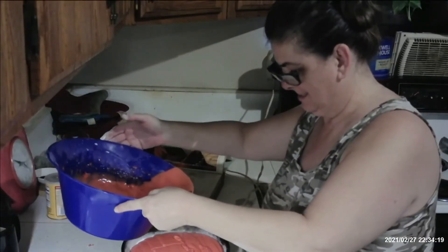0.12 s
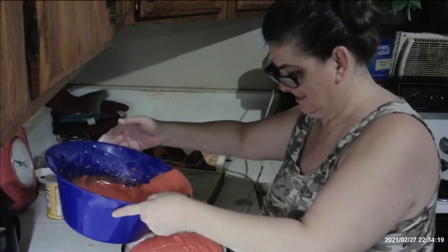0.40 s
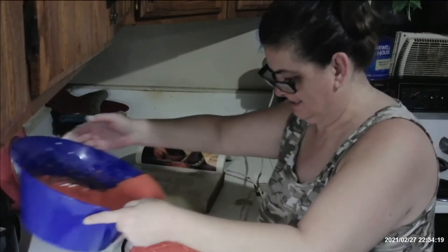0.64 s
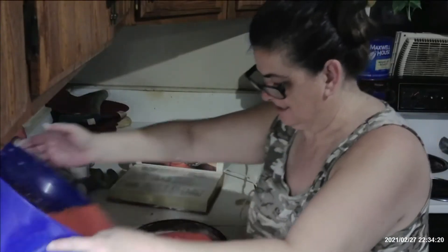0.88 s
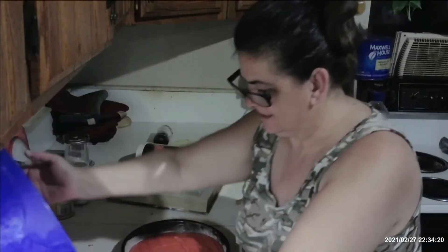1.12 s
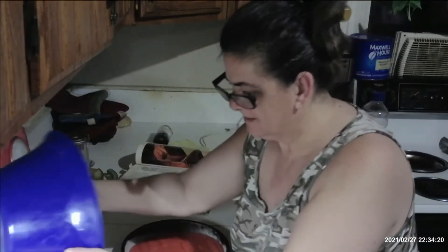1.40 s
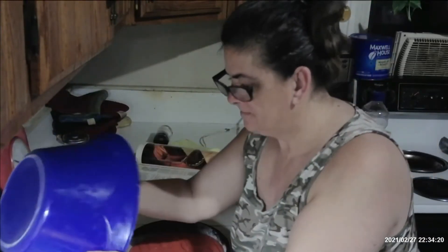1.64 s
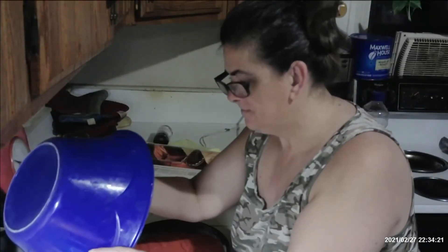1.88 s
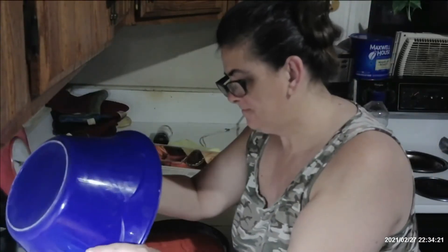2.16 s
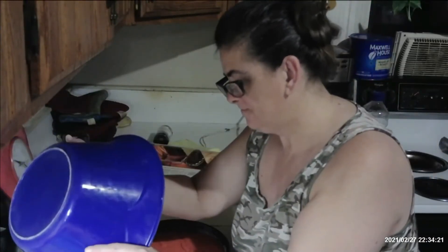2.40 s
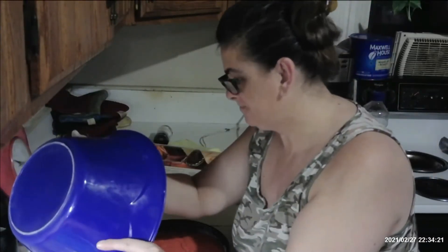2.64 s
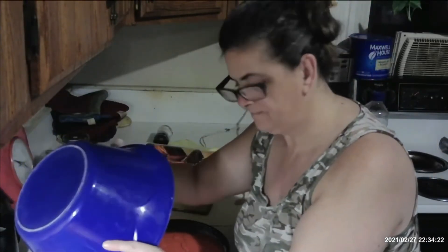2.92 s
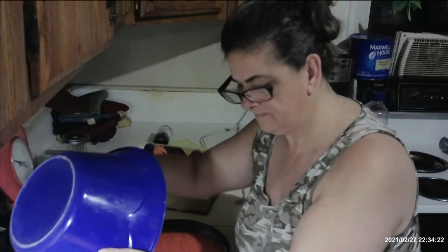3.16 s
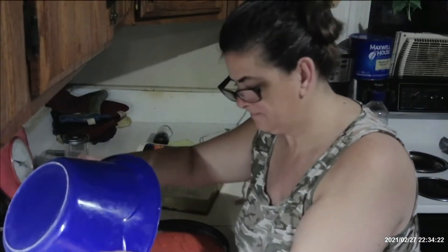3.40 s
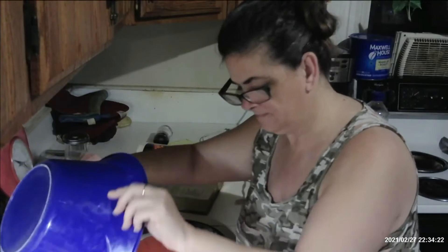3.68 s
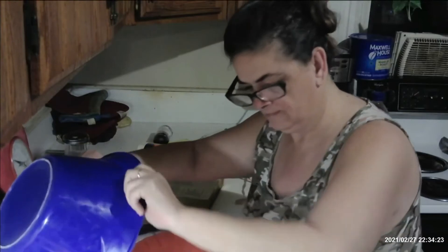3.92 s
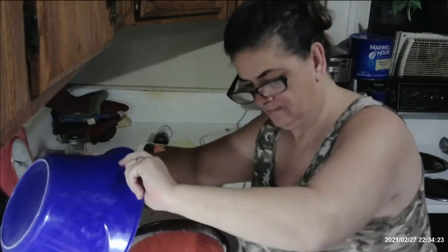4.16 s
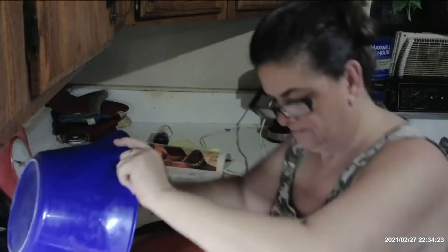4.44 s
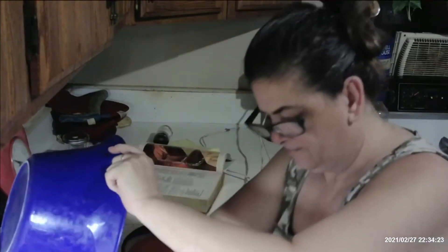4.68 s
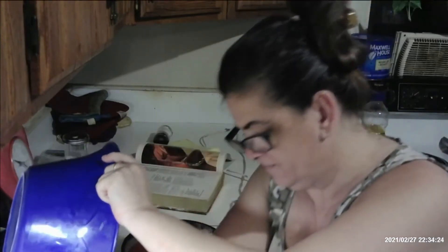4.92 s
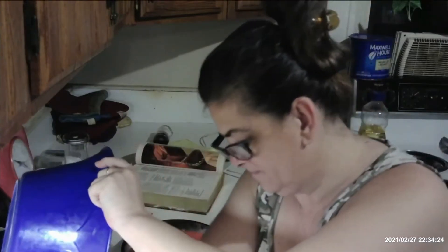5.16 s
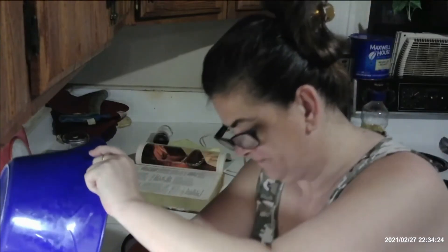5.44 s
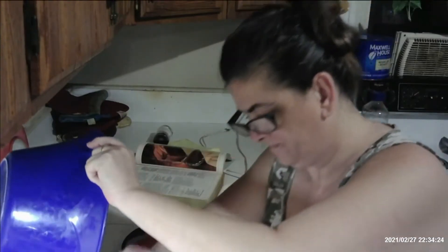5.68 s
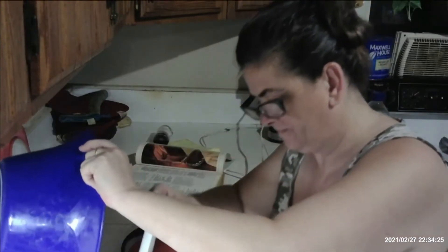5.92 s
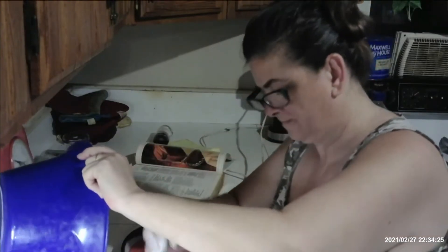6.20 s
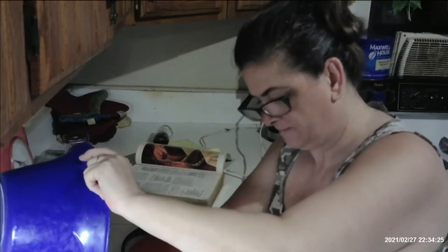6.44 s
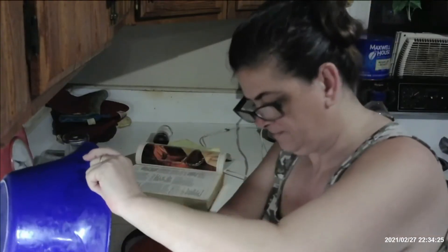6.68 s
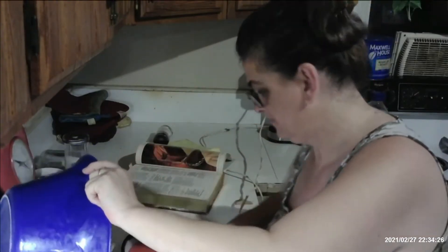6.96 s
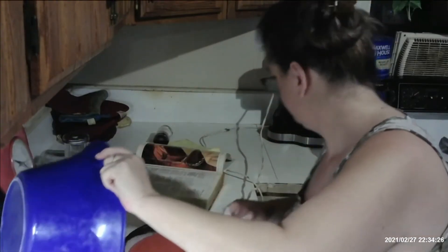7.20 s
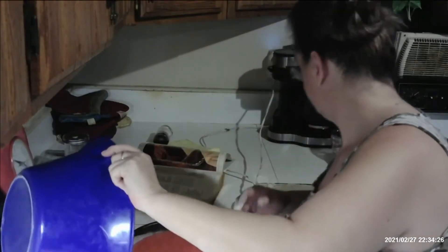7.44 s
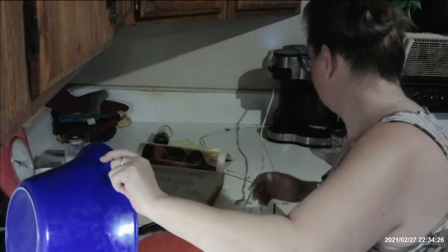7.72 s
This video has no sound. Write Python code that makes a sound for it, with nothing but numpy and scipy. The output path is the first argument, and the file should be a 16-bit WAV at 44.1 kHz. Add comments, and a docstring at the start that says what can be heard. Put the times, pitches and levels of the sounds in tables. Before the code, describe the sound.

A small kitchen heard through a close, modest microphone with softened treble: steady broadband hiss and a faint, wavering refrigerator hum run throughout. The first second holds only this background. At about 1.1 and 1.3 s the plastic bowl is lightly bumped, with a barely audible thin squeak. Short, wet, sticky scrapes come around 2.0-2.4 s, then softer strokes from 2.9 s, with a small tap at 3.7 s. From 4 s the spatula strokes lengthen and strengthen, with light ticks. At 4.8 s a duller knock starts an uneven clatter, growing dense from 5.2 to 5.9 s, hollow plastic clacks and bright snaps over heavy scraping, loudest near 5.7 s. A brief lull follows. Three hard knocks land at 6.55, 6.64 and 6.82 s, freer ringing, the first two with low counter thuds, with tiny rattles after the last two. A faint rub and soft thud near 7.1 s fade into hum.

```python
"""A small kitchen: a spatula scrapes thick batter out of a plastic bowl in wet strokes, then blade and
handle clatter against the wall, and three knocks follow as bowl and tool meet the counter.
Strokes are lumpy noise and tiny slips that shake the bowl; blows are clicks, snaps and dying modes.
A refrigerator hums in wavering tones under a steady noise wash of room and microphone."""
import sys
import numpy as np
from scipy import signal
from scipy.fft import rfft, irfft
from scipy.io import wavfile
from scipy.ndimage import uniform_filter1d

SR = 44100
rng = np.random.default_rng(int(sys.argv[2]) if len(sys.argv) > 2 else 0)


def elevation(decibels):
    """Turn decibel levels (scalar or array-like) into linear amplitude ratios."""
    levels = np.asarray(decibels, float)
    return 10 ** (levels / 20)


def dump_mix(stems):
    """Bounce the given channels to the path in sys.argv[1] as a 16-bit WAV at rate SR."""
    frames = np.atleast_2d(stems).T  # one column per channel
    limited = np.clip(frames, -1, 1)  # hard clip at full scale
    pcm = np.round(limited * 32767).astype(np.int16)
    wavfile.write(sys.argv[1], SR, pcm)


N = 345214  # length in samples

# modes of the plastic bowl: (f/Hz, relative level/dB, t60/s before grip or batter shortens it)
BOWL_MODES = [(303.52, -2, 0.22), (329.43, -4.5, 0.13), (429, -8.5, 0.11), (491, -7, 0.082),
              (552.5, -7, 0.18), (621.91, 1.5, 0.2151), (727, 0, 0.24043), (807, -5.5, 0.25),
              (879, -10.5, 0.4775), (1100, -3, 0.19605), (1145, -2, 0.14807), (1236, -10, 0.3244),
              (1324, -7, 0.3822), (1385, 6, 0.07122), (1360, -28, 0.4716), (1520, -39, 0.05),
              (1550, 3.5, 0.07784), (1627.3, -20.5, 0.12), (1748, -3.5, 0.2), (1895, 2, 0.12),
              (1960, 0, 0.038), (2196, 2, 0.08818), (2270, -10, 0.32), (2490, -7, 0.128),
              (2500, -17.5, 0.15), (2834, -7, 0.1575), (3050, -4.5, 0.1675), (3340, -26, .2),
              (3570, -3, 0.09726), (4016, -8, 0.27)]


def evened(x):
    """Scales to rms 1."""
    return x / np.sqrt(np.mean(x ** 2) + 1e-20)


def read(points, hz):
    """Reads a table on a log frequency axis."""
    f, value = np.transpose(points)
    return np.interp(np.log(hz + 1), np.log(f + 1), value)


def add(mix, s, sound):
    """Mixes a sound in at time s."""
    part = mix[round(s * SR):][:len(sound)]
    part += sound[:len(part)]


def resonate(x, hz, width_hz):
    """A two-pole resonance of gain near 1."""
    r = np.exp(-np.pi * width_hz / SR)
    return signal.lfilter([1 - r, 0, r - 1], [1, -2 * r * np.cos(2 * np.pi * hz / SR), r * r], x)


def drift(count, span):
    """Slow chance of rms 1."""
    return evened(uniform_filter1d(uniform_filter1d(rng.standard_normal(count), span), span))


def wash():
    """Steady room and microphone noise, coloured in frequency, with faint drifting patches."""
    # colour of the noise: (f/Hz, relative level/dB)
    wash_colour = [(12, -69), (20, -27), (59, -16.5), (90, -23.5), (109, -10.5), (143, -13), (172, -7.5),
                   (208, -6.5), (295, -7), (328, -3), (356, -7.5), (864, -2), (1650, -10), (1790, -10),
                   (12400, -25), (16100, -76), (22000, -120)]
    level_db, top_hz, patch_db = -55, 12450, 0.8213
    hz, _, z = signal.stft(rng.standard_normal(N), SR, nperseg=2048, noverlap=1536)
    patches = evened(uniform_filter1d(uniform_filter1d(rng.standard_normal(z.shape), 16, 0), 8, 1))
    z = z * elevation(read(wash_colour, hz)[:, None] + patch_db * patches)
    z = z * (hz < top_hz)[:, None]
    noise = signal.istft(z, nperseg=2048, noverlap=1536)[1][:N]
    return elevation(level_db) * evened(noise)


def refrigerator():
    """Motor tones that waver a little in level and pitch."""
    # steady tones of the hum: (f/Hz, rms level/dB about which it wavers)
    hum_tones = [(120, -77.5), (240, -82), (267, -74.5), (300.5, -70), (641, -78.5), (6352, -82)]
    t, slow = np.arange(N) / SR, np.linspace(0, N / SR, 800)
    hum = np.zeros(N)
    for hz, db in hum_tones:
        level = np.interp(t, slow, elevation(db + 2.3 * drift(800, 14)))
        phase = np.interp(t, slow, 0.5106 * drift(800, 9))
        hum += level * np.sqrt(2) * np.sin(2 * np.pi * hz * t + phase)
    return hum


def kitchen(x):
    """Sparse reflections of random sign, each band dying at its own speed; three echo patterns
    blend slowly into one another, so no single room colour stands out."""
    # how long the room rings: (f/Hz, t60/s)
    room_decay = [(200, 0.62), (700, 0.26), (2000, 0.34), (5000, 0.31), (10000, 0.4)]
    out, turn = np.zeros(N), np.arange(N) / SR / .21
    for k in range(3):
        taps = np.zeros(SR // 2)
        at = np.arange(200, len(taps) - 20, 20)
        taps[at + rng.integers(0, 20, len(at))] = rng.choice([-1., 1.], len(at))
        hz, t, z = signal.stft(taps, SR, nperseg=256)
        fading = z * elevation(-60 * t / read(room_decay, hz)[:, None])
        tail = signal.istft(fading, SR, nperseg=256)[1]
        share = np.sqrt(2 / 3) * np.cos(np.pi * (turn + k / 3))  # squares of the three shares sum to 1
        out += signal.oaconvolve(x * share, tail / np.linalg.norm(tail))[:N]
    return out


def microphone(x):
    """The small microphone dulls the treble, most of all near 13 kHz."""
    # microphone response: (f/Hz, gain/dB)
    response = [(20, -2.5), (9000, 0.5), (11500, -7), (13000, -18), (16000, -7)]
    return irfft(rfft(x) * elevation(read(response, np.fft.rfftfreq(N, 1 / SR))), N)


def squeak(start, length, db, hz):
    """A thin tone wavering in pitch and level."""
    t = np.arange(0, length, 1 / SR)
    turns = np.cumsum(hz + 20. * drift(len(t), 300)) / SR
    level = elevation(db + 2.5 * drift(len(t), 700))
    return start, level * np.sin(2 * np.pi * turns) * signal.windows.hann(len(t))


def ring(modes, push_db, free, spread_db, detune):
    """Dying sines, one column a mode; each blow lands elsewhere and the grip shifts, so they scatter."""
    t = np.arange(SR // 4)[:, None] / SR
    hz, db, t60 = np.transpose(modes)
    place, grip, side = rng.standard_normal((3, len(hz)))
    rise = 1 - np.exp(-t * hz)  # a mode takes a cycle or two to swing out
    waves = rise * np.sin(2 * np.pi * hz * (1 + detune * grip) * t) * np.sign(side)
    decay = elevation(push_db + db + spread_db * place - 60 * t / (free * t60))
    fade = signal.windows.tukey(2 * len(t), .3)[len(t):, None]
    return decay * waves * fade


def thud(push_db):
    """Weight landing on the counter, which answers with a few low modes."""
    # modes of the counter: (f/Hz, relative level/dB, t60/s before the load shortens it)
    counter_modes = [(71.32, -11, 0.23), (120.2, -3, 0.1596), (162.71, -5.5, 0.41), (196.64, 1, 0.3),
                     (222, -2, 0.26)]
    return ring(counter_modes, push_db, free=0.86, spread_db=1.9, detune=0.0053).sum(1)


def knock(free, click_db, click_hz, boom_db, snap_db):
    """A short click at the contact, a treble snap of the blade, and the bowl ringing on."""
    # blade edge: (f/Hz, width/Hz of each of two resonances in a row, relative level/dB)
    blade_edge = [(3240, 1400, 15.5), (4350, 3184.4, 18), (7300, 4275, -29)]
    boom_top_hz = 620  # modes below this make the boom
    ring_db = -4.5  # peak of the upper ring relative to the click
    t = np.arange(1500) / SR
    burst = rng.standard_normal((2, len(t))) * np.exp(-t / [[.003], [.004]])
    click = resonate(burst[0] + 4. * (t == 0), click_hz, 0.27 * click_hz)
    click = resonate(click, click_hz, 2.6 * click_hz)
    snap = sum(elevation(db) * resonate(resonate(burst[1], hz, w), hz, w) for hz, w, db in blade_edge)

    hz = np.transpose(BOWL_MODES)[0]
    low = hz < boom_top_hz
    held_db = -15. * (1 - free) * (hz < 400)  # the hand stills the widest swings first
    match_db = -6. * np.log2(hz / click_hz) ** 2  # a blow drives best the modes near its own pitch
    push_db = np.where(low, boom_db + held_db, match_db)
    freedom = np.where(low, free, 0.3201 * free)
    modes = ring(BOWL_MODES, push_db, freedom, spread_db=0.96, detune=0.012)

    # the contact chatters: small after-blows roughen the upper ring
    after = np.arange(5000) / SR
    struck = rng.random(5000) < 2000. / SR  # about 2000 after-blows a second
    chatter = 0.26344 * rng.standard_normal(5000) * struck * np.exp(-after / (0.021 * free))
    chatter[0] = 1
    out = signal.fftconvolve(modes[:, ~low].sum(1), chatter)
    out *= elevation(click_db + ring_db) / abs(out).max()
    add(out, 0, modes[:, low].sum(1))
    add(out, 0, elevation(click_db) * click / abs(click).max())
    add(out, 0, elevation(snap_db) * snap / abs(snap).max())
    return out


def rattle(start, length, db):
    """The tool rattles loosely against the wall: small uneven blows as rows for knock."""
    gap_s, pitch_hz, boom_db, snap_db = .012, 1296.3, -7, -34  # boom and snap relative to the click
    slip, size, pitch, boom, snap = rng.standard_normal((40, 5)).T
    s = start + gap_s * (np.arange(len(slip)) + .25 * slip)
    db = db + 2 * size
    rows = [s, db, pitch_hz * np.exp(.25 * pitch), db + boom_db + 2.944 * boom, db + snap_db + 3.1 * snap]
    return list(np.transpose(rows)[s < start + length])


def stroke(start, bite, length, hiss_db, bright):
    """Wet friction: lumpy hiss and tiny sticky slips, which also shake the bowl wall."""
    # colour of the scrape before each stroke's own tilt: (f/Hz, relative level/dB)
    scrape_colour = [(180, -25), (300, -20.5), (447, 1.5), (574, 2.5), (624, -25), (737, 10.5), (1300, 2.5),
                     (4750, 0.5), (8220, -5.5), (16000, -22)]
    # a stroke bites from edge_db up, sags while it is drawn, and lifts off
    edge_db, sag_db_per_s, lift_s = -12.5, -4.5, 0.13
    wall_db, wall_per_bright = -12.5, -0.74  # a duller, heavier stroke shakes the wall more
    t = np.arange(0, length, 1 / SR)
    count = round(.6 * SR)  # drawn longer than any stroke, then cut
    size, chance, side = rng.random((3, count))[:, :len(t)]
    slip_size = elevation(2.1 * np.minimum(-np.log(size + 1e-9), 4))
    slips = slip_size * (chance < 900 / SR) * np.sign(side - .5)  # about 900 slips a second
    rub = (elevation(1.597 * drift(count, 250)) * rng.standard_normal(count))[:len(t)]
    drive = evened(rub) + 0.6828 * evened(slips)

    hz, _, z = signal.stft(drive, SR, nperseg=256, noverlap=192)
    colour = elevation(read(scrape_colour, hz) + bright * np.log2(hz / 4000 + 0.02994))
    hiss = signal.istft(z * colour[:, None], nperseg=256, noverlap=192)[1][:len(t)]
    # batter and hand damp the wall, so its modes are broad here
    wall = np.zeros(len(t))
    for k, (f, db, t60) in enumerate(BOWL_MODES):
        wall += (-1) ** k * elevation(db) * resonate(drive, f, 13.62 / t60)

    lift = min(lift_s, length - bite)
    edge = np.clip(np.maximum(1 - t / bite, 1 - (length - t) / lift), 0, 1)
    shape_db = edge_db * edge + sag_db_per_s * t
    both = evened(hiss) + elevation(wall_db + wall_per_bright * bright) * evened(wall)
    return start, elevation(hiss_db + shape_db) * both * signal.windows.tukey(len(t), .1)


def scene():
    """Bowl sounds and their reflections through the microphone, over the background."""
    # strokes of the spatula: (t/s, time to full bite/s, length/s, hiss level/dB, brightness/dB per octave)
    strokes = [(1.401, .04, 0.0603, -59, 6), (1.998, .04, 0.0922, -55.5, -3.5),
               (2.148, 0.05232, 0.1059, -48, -3), (2.314, 0.0275, 0.05625, -45, -3),
               (2.86, .04, 0.2905, -59, -3.5), (3.169, 0.07466, 0.2035, -56, 2.5),
               (3.497, 0.06512, 0.25, -49, -0.5), (3.708, .03, 0.19717, -54.5, -3),
               (4.03, 0.2, 0.2, -50.5, -1.5), (4.22, 0.04527, 0.30466, -46.5, -0.5),
               (4.618, 0.0094, 0.47, -48, 0.0), (5.067, 0.07636, 0.35, -41, -.5),
               (5.331, 0.1122, 0.21272, -37, -2.5), (5.55, 0.01192, 0.1471, -35, -2.5),
               (5.748, 0.03117, .13, -33, -6), (6.83, 0.0232, 0.134, -57.5, -8),
               (7.122, 0.0489, 0.1652, -59, -0.5)]
    # blows on the bowl: (t/s, click peak level/dB, contact pitch f/Hz, push on the low modes/dB,
    # treble snap peak level/dB)
    knocks = [(1.137, -39.5, 950, -38.5, -62), (1.261, -39.5, 1007, -47.5, -63),
              (3.739, -39, 970, -71, -61), (4.292, -44.5, 1080, -61, -38.5), (4.405, -40, 1220, -57, -44),
              (4.637, -53, 1500, -65, -37), (4.82, -31, 670, -19.5, -27), (4.962, -33.5, 1539, -33, -44),
              (5.043, -35.5, 780, -34.5, -51), (5.136, -30, 1198, -52, -44), (5.161, -33.5, 814, -30, -44),
              (5.185, -20, 727, -35, -45), (5.205, -26, 690, -25.5, -34.5), (5.273, -28, 590, -25, -35.5),
              (5.286, -28, 660.3, -23.5, -20), (5.323, -20, 1350, -18.5, -37),
              (5.358, -27, 1280, -26, -29.5), (5.409, -28, 714.6, -25.5, -24),
              (5.429, -18.5, 620, -28, -24), (5.493, -24, 1212, -25.5, -25), (5.567, -20, 1143, -35, -25),
              (5.574, -14.5, 930, -23, -40.5), (5.594, -24, 1700, -33.5, -38),
              (5.604, -12, 1520, -20.5, -47), (5.621, -31, 1550, -42, -18), (5.64, -10.5, 1707, -44.5, -45),
              (5.651, -13.5, 784.3, -20, -39), (5.667, -14, 1151, -22.5, -10),
              (5.685, -10.5, 790, -23, -41), (5.723, -3, 1445, -25, -18), (5.748, -27, 1100, -21.5, -12.5),
              (5.791, -14, 620, -40.5, -11), (5.855, -20.5, 583.4, -44.5, -26.5),
              (5.882, -28.5, 571.8, -48, -62), (6.55, -6, 1410, -13.5, -23), (6.558, -8.5, 1464, -30, -39),
              (6.578, -20, 700, -19.5, -31.5), (6.643, -13, 1206, -22.5, -15.5),
              (6.818, -18, 1272, -29.5, -23.5)]
    # loose rattling of the tool: (t/s, length/s, typical click peak level/dB)
    rattles = [(5.13, .36, -38.5), (6.651, .05, -29), (6.831, 0.092, -34)]
    # weight landing on the counter: (t/s, push on its modes/dB)
    thuds = [(4.45, -53.5), (4.817, -36), (4.959, -32.5), (5.244, -33.5), (5.413, -35.5), (5.574, -34.5),
             (5.65, -38.5), (5.723, -43), (5.799, -45), (6.55, -26.5), (6.644, -26), (6.818, -56),
             (7.171, -59.5)]
    # a faint whistle: (t/s, length/s, level/dB, f/Hz)
    whistle = (1.29, 0.2289, -57, 1433.5)
    # how freely the bowl rings, 0-1: pressed by hand and blade, then set down
    pressed, loose, set_down_s = 0.59, 0.87, 6.2

    background = wash() + refrigerator()
    bowl = np.zeros(N)
    add(bowl, *squeak(*whistle))
    for s, push_db in thuds:
        add(bowl, s, thud(push_db))
    blows = list(knocks)
    for row in rattles:
        blows += rattle(*row)
    for s, *blow in blows:
        add(bowl, s, knock(pressed if s < set_down_s else loose, *blow))
    for row in strokes:
        add(bowl, *stroke(*row))
    bowl = bowl + elevation(-7.0) * kitchen(bowl)
    return (microphone(bowl) + background)[None]


def roll_off(x):
    """The treble ends steeply here."""
    return signal.sosfilt(signal.butter(12, 16440, fs=SR, output="sos"), x)


def record(dry):
    """Passes the finished mix on to be stored."""
    return roll_off(dry)


dry = scene()
out = record(dry)
dump_mix(out)
```